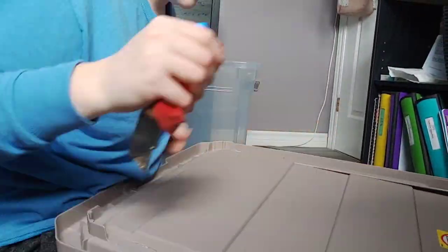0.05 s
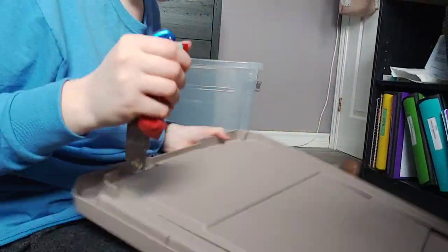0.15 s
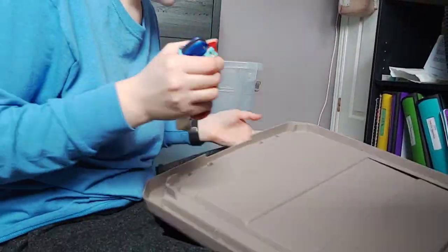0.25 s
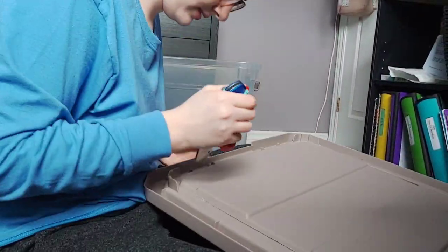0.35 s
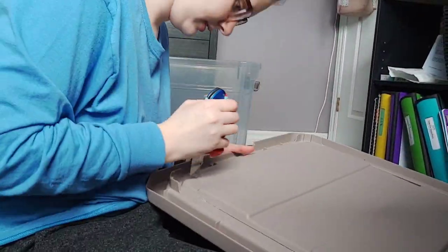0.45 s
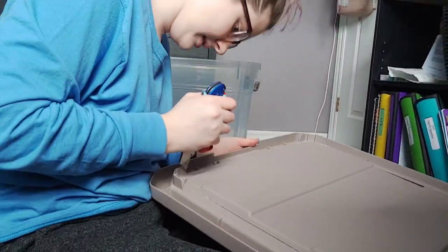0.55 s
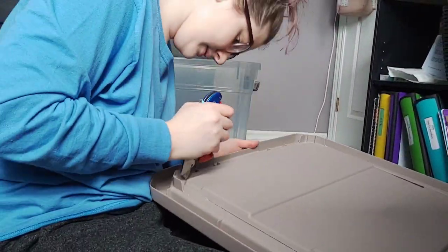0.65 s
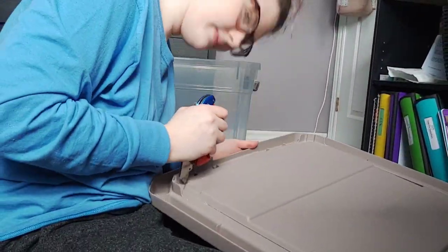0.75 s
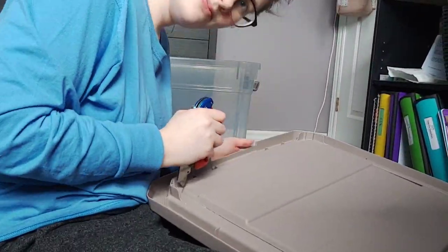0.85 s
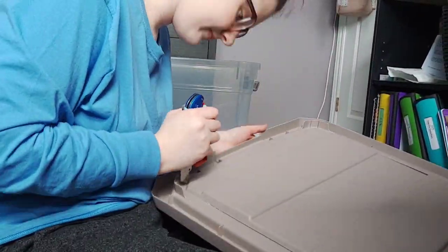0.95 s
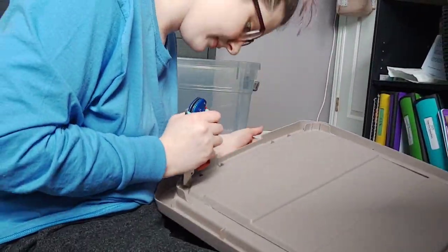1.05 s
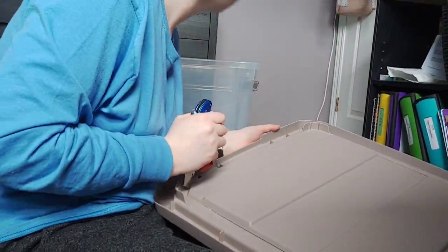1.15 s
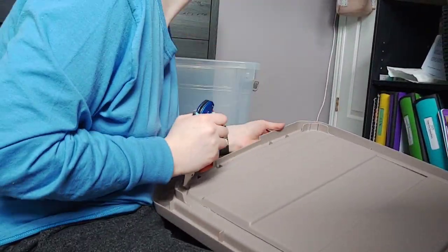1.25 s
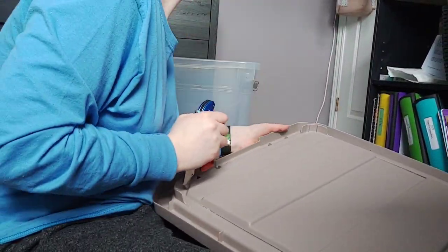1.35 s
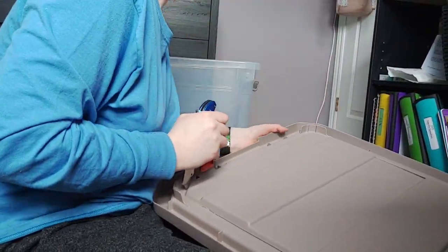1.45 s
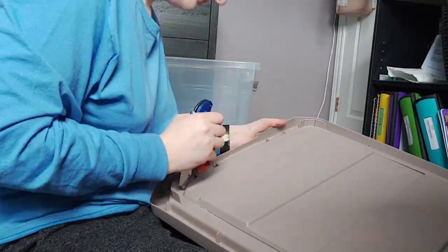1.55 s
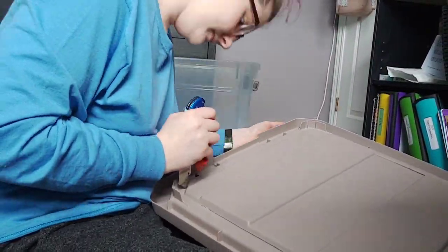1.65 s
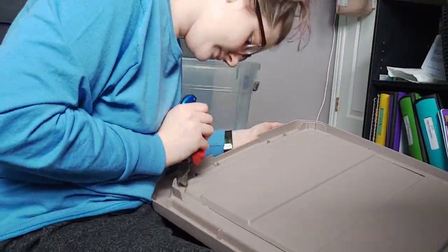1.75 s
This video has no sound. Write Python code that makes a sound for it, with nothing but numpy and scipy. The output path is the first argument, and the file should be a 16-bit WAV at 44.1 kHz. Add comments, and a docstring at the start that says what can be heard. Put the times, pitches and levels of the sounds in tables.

```python
"""Plastic lid and box cutter

A plastic storage lid is swung round and set down with a slap and a clatter, close by in a small room.
Each blow rings its low modes under a short crack of higher ones; sleeve and hand rustle faintly on it.
Then a box cutter is set on its edge: the blade clicks, scrapes, creaks and catches in short slips,
and the lid knocks as it gives."""
import sys
import numpy as np
from scipy import signal
from scipy.fft import rfft, irfft
from scipy.io import wavfile
from scipy.ndimage import uniform_filter1d

SR = 44100
rng = np.random.default_rng(int(sys.argv[2]) if len(sys.argv) > 2 else 0)


def wav_out(sig):
    """Save sig, one row per channel (or a flat mono array), as 16-bit PCM at SR to the path in sys.argv[1]."""
    wavfile.write(sys.argv[1], SR, np.round(np.clip(np.atleast_2d(sig).T, -1, 1) * 32767).astype(np.int16))


N = 79380
EVENT_SAMPLES = 8192


def amp(db):
    """Decibels to gain."""
    return 10 ** (np.asarray(db) / 20)


def curve_at(points, hz):
    """Interpolate on a log-frequency axis."""
    points_hz, values = np.transpose(points)
    return np.interp(np.log(hz + 1), np.log(points_hz + 1), values)


def add(mix, start_s, sound):
    """Lay a stereo sound into the mix."""
    part = mix[:, max(round(start_s * SR), 0):][:, :sound.shape[1]]
    part += sound[:, :part.shape[1]]


def pan(left_over_right_db):
    """Left and right gains."""
    return amp(np.array([[left_over_right_db], [-left_over_right_db]]) / 2)


def freqs(size):
    """FFT bin frequencies, floored at 1 Hz."""
    return np.maximum(np.fft.rfftfreq(size, 1 / SR), 1)


def white(size):
    """Two independent white noises."""
    return rng.standard_normal((2, size))


# Left-right likeness: freq_hz, correlation
STEREO_LIKENESS = [(60, 1), (350, 0.77), (700, 0.62), (1400, 0.046), (3000, 0.013), (15000, 0.17)]


def colour(noise, octave_db):
    """Partly correlate two white signals and shape their level per octave, minimum phase."""
    size = noise.shape[1]
    hz = freqs(size)
    left, independent = rfft(noise)
    likeness = np.clip(curve_at(STEREO_LIKENESS, hz), -1, 1)
    right = likeness * left + np.sqrt(1 - likeness ** 2) * independent
    gain = amp(octave_db) * np.sqrt(SR / (2 * np.log(2) * np.maximum(hz, 20)))
    cepstrum = irfft(np.log(gain), size)
    cepstrum[1:size // 2] *= 2
    cepstrum[size // 2 + 1:] = 0
    return irfft(np.array([left, right]) * np.exp(rfft(cepstrum)), size)


def band_decay(x, t60_curve, bands=9):
    """Each band decays at its own rate."""
    size = x.shape[1]
    hz, t, spectrum = freqs(size), np.arange(size) / SR, rfft(x)
    centres_hz = np.geomspace(60, 15000, bands)
    decayed = 0
    for centre_hz, weights in zip(centres_hz, np.eye(bands)):
        band = irfft(spectrum * np.interp(np.log(hz), np.log(centres_hz), weights))
        decayed += band * amp(-60 * t / curve_at(t60_curve, centre_hz))
    return decayed


def shelves_db(hz, bass_db, treble_db, bass_hz=324, treble_hz=4450):
    """Bass and treble shelves."""
    return bass_db / (1 + (hz / bass_hz) ** 2) + treble_db / (1 + (treble_hz / hz) ** 4)


def resonance_db(hz, centre_hz, height_db, half_width_oct):
    """One resonant peak."""
    return height_db / (1 + (np.log2(hz / centre_hz) / half_width_oct) ** 2)


def ripple_db(size, width_hz=140, spread_db=0.5):
    """Each contact favours its own set of closely spaced modes."""
    window = np.hanning(max(3, round(2 * width_hz * size / SR)))
    ripple = signal.fftconvolve(rng.standard_normal(size // 2 + 1), window, "same")
    return spread_db * ripple / ripple.std() * np.minimum(freqs(size) / 1500, 1)


def struck_modes(modes, pitch_ratio, right_lag_s=0.00016, lowest_hz=131):
    """Modes struck together, with little sounding below lowest_hz."""
    t = np.maximum(np.arange(EVENT_SAMPLES) / SR - np.array([[0], [right_lag_s]]), 0)
    ring = sum(amp(db - 60 * t / t60_s) * np.sin(2 * np.pi * hz * pitch_ratio * t)
               for hz, db, t60_s in modes)
    return signal.sosfilt(signal.butter(3, lowest_hz, "highpass", fs=SR, output="sos"), ring)


# Still room: freq_hz, octave_db
HUSH_SPECTRUM = [(25, -79.5), (45, -88), (72, -68), (110, -83), (170, -74), (300, -72), (500, -73.5),
                 (1200, -75), (4000, -75), (7000, -84), (10000, -74), (15000, -73.5)]


def room_hush():
    """Steady, faint noise of the still room."""
    return colour(white(N), curve_at(HUSH_SPECTRUM, freqs(N)))


# Room decay: freq_hz, t60_s
ROOM_DECAY = [(100, 0.077), (500, 0.043), (2000, 0.35), (8000, 0.27), (15000, 0.6)]


def room_reverb(near, gain_db=-22.5, rise_s=0.0012, size=32768):
    """Short diffuse tail of a furnished room."""
    flat_noise = colour(white(size), 10 * np.log10(freqs(size)))
    onset = np.minimum(np.arange(size) / SR / rise_s, 1) ** 2
    tail = band_decay(flat_noise, ROOM_DECAY) * onset
    tail /= np.linalg.norm(tail[0])
    return amp(gain_db) * signal.fftconvolve(near, tail, axes=1)[:, :N]


# Sleeve and hand sliding on the lid: time_s, level_db
SLEEVE_ENVELOPE = [(0, -65), (0.076, -75), (0.117, -59.5), (.3, -60.5), (.4, -72.5), (0.503, -67),
                   (0.602, -76), (0.851, -76), (0.949, -68), (1.25, -68), (1.362, -80), (1.55, -75.5),
                   (1.8, -75.5)]
# Rustle: freq_hz, octave_db
SLEEVE_SPECTRUM = [(60, -2.5), (170, -1), (300, 4.5), (600, -1), (2000, -1.5), (5000, -2), (10000, -4.5),
                   (15000, -2.5)]


def sleeve_rustle(grain_db=2.5):
    """Cloth and skin slide on plastic with a faint, grainy rustle."""
    grain = uniform_filter1d(rng.standard_normal(N), 300)
    slide_db = np.interp(np.arange(N) / SR, *np.transpose(SLEEVE_ENVELOPE))
    envelope = amp(slide_db + grain_db * grain / grain.std())
    return colour(envelope * white(N), curve_at(SLEEVE_SPECTRUM, freqs(N)))


# Rim modes: freq_hz, level_db, t60_s
RIM_MODES = [(682, -13.5, 0.026), (930, 0, 0.05), (1252, -2, 0.069), (2000, -10.5, 0.038)]
# Blade catching in the rim: start_s, gain_db, pitch_ratio
BLADE_CATCHES = [(.9665, -56, 0.78), (1.0150, -49, 0.98), (1.1375, -53, 1.02), (1.2292, -44.5, 0.99),
                 (1.2505, -50.5, 0.98), (1.2968, -46, 1), (1.3215, -59, 1.1)]


def blade_catch(gain_db, pitch_ratio):
    """The blade sticks and lets go, ringing the rim; the grip shifts the pitch."""
    return amp(gain_db) * struck_modes(RIM_MODES, pitch_ratio)


# Scraped plastic: freq_hz, octave_db
SCRAPE_SPECTRUM = [(40, -26), (100, -28.5), (170, -0.5), (350, 0.5), (600, -1.5), (1200, -6.5), (2300, -6),
                   (4100, -6), (5600, -8), (10000, -2.5), (14000, -19.5)]
# Lid resonances under the blade: centre_hz, width_hz, height_db
PANEL_RESONANCES = [(552, 70, 7), (984, 390, 4), (1720, 260, 4.5), (2320, 67, 8.5), (3252, 120, 0),
                    (3870, 420, 6), (4440, 230, 4.5)]
# Scrapes and creaks: start_s, length_s, gain_db, ring_hz, ring_db, bass_db, treble_db
SCRAPE_STROKES = [(.098, 0.089, -64, 465, 13.5, 18, 9), (.1305, 0.017, -37.5, 566, 19.5, -4, -19.5),
                  (.143, 0.015, -45, 566, 11.5, 7, 0.5), (.192, 0.028, -60, 370, 22.5, 13, -16),
                  (.245, 0.053, -58, 480, -6, 11.5, -3), (.286, 0.076, -47.5, 480, 6, -4, -3.5),
                  (.331, 0.033, -47, 2520, 13.5, -3.5, 12), (.402, 0.03, -55.5, 273, 10.5, 9.5, -4),
                  (.426, 0.032, -40, 430, 5, -5, -7), (.448, 0.022, -53, 645, 3, -5, -4),
                  (.513, 0.034, -47, 467, 1.5, -6.5, -1), (.645, 0.076, -69.5, 297.6, -2.5, 15.5, -7.5),
                  (.893, 0.059, -66.5, 258.7, 5.5, 9.5, 4.5), (.958, 0.024, -69, 1122, 23.5, -12, -9.5),
                  (1.005, 0.054, -63, 1070, 8.5, 12.5, 4), (1.07, 0.036, -64.5, 1210, 12.5, 8, 7),
                  (1.135, 0.039, -52.5, 540, -2, 4, -13.5), (1.172, 0.094, -68.5, 1240, 7, 11, 8.5),
                  (1.212, 0.079, -67.5, 860, 11, 1, -6), (1.288, 0.05, -62, 1254, 13, 11, -1),
                  (1.563, 0.038, -59.5, 4190, 6, 5, 3), (1.6275, 0.033, -51, 421, 11.5, 2.5, -9.5),
                  (1.652, 0.029, -58, 527, 8, 2, -4.5)]


def scrape(length_s, gain_db, ring_hz, ring_db, bass_db, treble_db, size=EVENT_SAMPLES):
    """Uneven slips and fine rubbing drive the plastic, which rings at a pitch set by the grip."""
    slips_per_s, slip_spread_db, rub_share = 1200, 2.5, 0.55
    rise_share, fall_share = 0.25, 0.47
    progress, hz = np.arange(size) / SR / length_s, freqs(size)
    ramp = np.minimum(progress / rise_share, (1 - progress) / fall_share)
    stroke = np.sin(np.pi / 2 * np.clip(ramp, 0, 1))
    slips = rng.choice([-1., 1.], (2, size)) * amp(slip_spread_db * rng.standard_normal(size))
    slips *= rng.random(size) < slips_per_s / SR
    slips /= np.sqrt(np.sum((slips * stroke) ** 2) / (2 * np.sum(stroke ** 2)) + 1e-12)  # unit power
    drive = stroke * (np.sqrt(1 - rub_share) * slips + np.sqrt(rub_share) * white(size))
    peaks_db = resonance_db(hz, ring_hz, ring_db, half_width_oct=0.31) + ripple_db(size)
    peaks_db += sum(height_db / (1 + (2 * (hz - centre_hz) / width_hz) ** 2)
                    for centre_hz, width_hz, height_db in PANEL_RESONANCES)
    octave_db = gain_db + curve_at(SCRAPE_SPECTRUM, hz) + peaks_db + shelves_db(hz, bass_db, treble_db)
    return colour(drive, octave_db) * pan(0.8)


# Hard contact: freq_hz, octave_db
CLICK_SPECTRUM = [(60, -28), (200, -11.5), (600, -2), (1300, -5.5), (2400, -3.5), (4200, -0.5),
                  (7800, -4.5), (10200, -1), (12500, -8.5), (16000, -15.5)]
# Clicks of cutter and rim: start_s, gain_db, t60_s, bass_db, pan_db, ring_hz
HARD_CLICKS = [(.1850, -18.5, 0.0092, 2.5, -8, 5300), (.1864, -19, 0.025, -15, 2, 9500),
               (.2114, -41, 0.016, -5, 4, 3520), (.3347, -26.5, 0.064, -25, 1.5, 6700),
               (.5195, -57, 0.026, -11, 10, 4200), (.5408, -51, 0.084, 9.5, 2, 10000),
               (.7695, -54.5, 0.015, 18, 5.5, 8560), (1.0148, -55.5, 0.023, -9, 5, 1910),
               (1.0402, -55, 0.012, -3, 0, 3480), (1.5852, -52.5, .016, 7.5, 4, 4120),
               (1.6558, -56.5, 0.037, 8, 0, 8300)]


def click(gain_db, t60_s, bass_db, pan_db, ring_hz, rise_s=0.0006, size=EVENT_SAMPLES):
    """Small hard parts meet: a brief, bright, dense ring with a peak at the part's own pitch."""
    t, hz = np.arange(size) / SR, freqs(size)
    noise = white(size)
    peaks_db = resonance_db(hz, ring_hz, height_db=6.5, half_width_oct=0.25) + ripple_db(size)
    ring = colour(noise, curve_at(CLICK_SPECTRUM, hz) + peaks_db + shelves_db(hz, bass_db, 0))
    envelope = amp(gain_db - 60 * t / t60_s) * np.minimum(t / rise_s, 1)
    return ring * envelope * pan(pan_db)


# Lid modes: freq_hz, level_db, t60_s
LID_MODES = [(165.8, -17.5, 0.059), (365.1, -14, 0.041), (493, -13.5, 0.034), (595, -19, 0.035),
             (668, -25, 0.076), (1119.4, -17.5, 0.049), (1230, -24, 0.071), (1294, -25, 0.1),
             (1595, -21, 0.048), (1908, -21.5, .05), (2710, -25.5, 0.025), (3390, -25, 0.035),
             (3980, -22.5, .05), (4260, -19, 0.065)]
# Crack of the many higher modes: freq_hz, octave_db
CRACK_SPECTRUM = [(30, -35.5), (90, -35), (250, -32.5), (500, -21), (1000, -23.5), (1900, -15),
                  (4200, -16.5), (6200, -26), (10000, -22), (14000, -34)]
# Crack decay: freq_hz, t60_s
CRACK_DECAY = [(60, 0.15), (400, 0.019), (2500, .045), (8000, 0.049), (15000, 0.037)]


def lid_blow(pitch_ratio, rise_s=0.001, size=EVENT_SAMPLES):
    """A blow rings the lid's low modes with a short crack."""
    t = np.arange(size) / SR
    crack = colour(white(size), curve_at(CRACK_SPECTRUM, freqs(size)) + ripple_db(size))
    crack = band_decay(crack, CRACK_DECAY) * (1 - np.exp(-t / rise_s))
    return (struck_modes(LID_MODES, pitch_ratio) + crack) * pan(3)


# Lighter knocks of the lid: start_s, gain_db, highpass_hz, lowpass_hz, pitch_ratio
LID_KNOCKS = [(.1610, 0, 870, 5000, 1.03), (.1866, -9, 250, 2490, 1.68), (.2112, -11, 323, 770, 1.35),
              (.3085, -26, 460, 1000, 1.85), (.3425, -26.5, 153, 294, 0.81), (.4015, -20.5, 144, 153, 0.75),
              (.4360, -18, 152.2, 1100, 0.9), (.7682, -38.5, 263, 1620, 1.1), (1.0402, -23, 201, 517, 1.2),
              (1.1575, -27, 137, 404, 0.78), (1.2975, -33, 247, 500, 1.05), (1.3230, -30, 195.3, 590, 0.88),
              (1.5850, -24.5, 280, 650, 1.24), (1.6385, -18, 293, 220, 1.237),
              (1.6482, -17.5, 217, 230, 0.85), (1.7348, -37, 215.6, 650, 0.76)]


def lid_knock(gain_db, highpass_hz, lowpass_hz, pitch_ratio, hand_t60_s=0.098, tick_gain=0.0094):
    """A blow damped by the hand; a smaller contact has less bass, a softer one less treble."""
    highpass = signal.butter(2, highpass_hz, "highpass", fs=SR, output="sos")
    blow = signal.sosfilt(highpass, lid_blow(pitch_ratio))
    blow *= amp(-60 * np.arange(blow.shape[1]) / SR / hand_t60_s)
    pole = np.exp(-2 * np.pi * lowpass_hz / SR)
    dulled = signal.lfilter([1 - pole], [1, -pole], blow)
    return amp(gain_db) * (dulled + tick_gain * blow)


def lid_slap(gain_db=3.5):
    """The lid lands and rings freely."""
    return amp(gain_db) * lid_blow(pitch_ratio=1)


def scene():
    """Sleeve, cutter and lid in the room."""
    near = sleeve_rustle()
    hush = room_hush()
    add(near, start_s=0.1575, sound=lid_slap())
    for events, source in ((LID_KNOCKS, lid_knock), (HARD_CLICKS, click),
                           (BLADE_CATCHES, blade_catch), (SCRAPE_STROKES, scrape)):
        for start_s, *settings in events:
            add(near, start_s, source(*settings))
    return near + room_reverb(near) + hush


def record(dry):
    """Clip at full scale, then band-limit."""
    cutoff_hz = 15800
    lowpass = signal.firwin(255, cutoff_hz, window=("kaiser", 9), fs=SR)
    return signal.oaconvolve(np.clip(dry, -1, 1), lowpass[None], "same")


dry = scene()
out = record(dry)
wav_out(out)
```